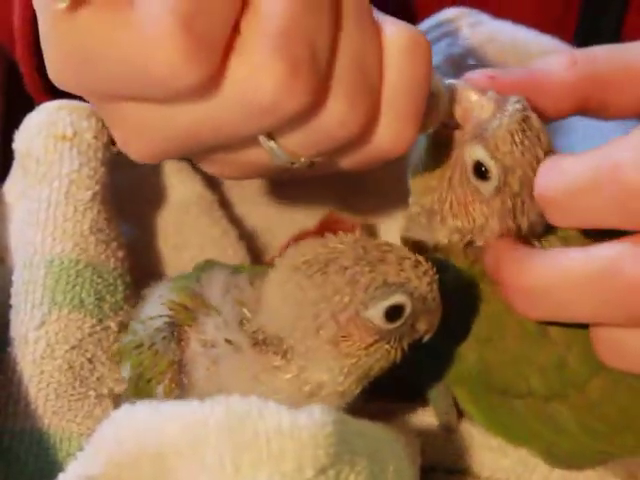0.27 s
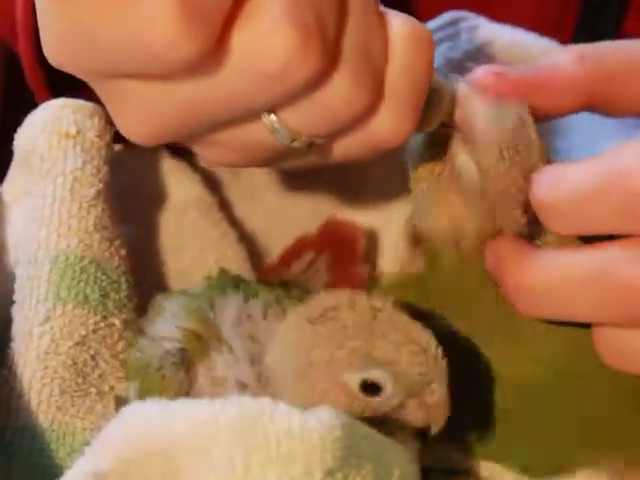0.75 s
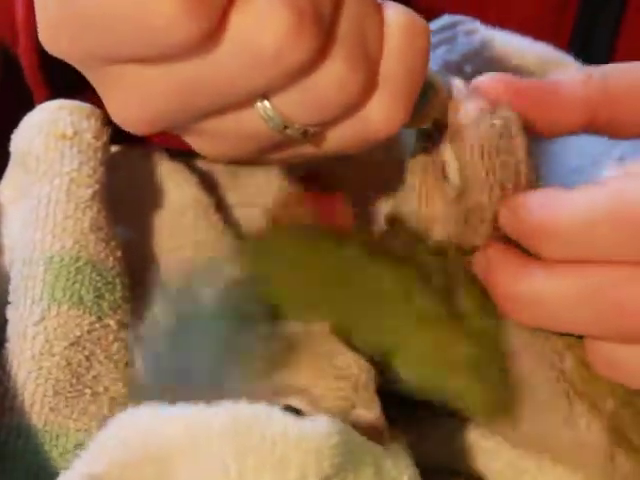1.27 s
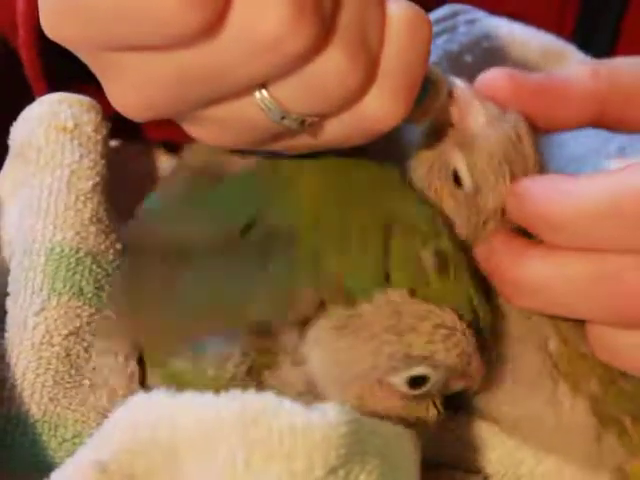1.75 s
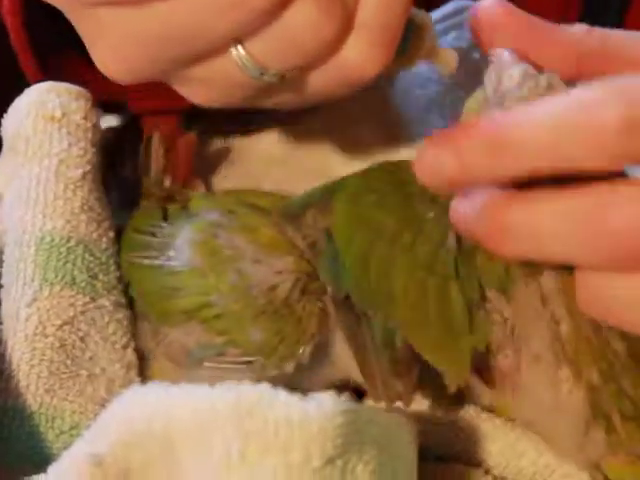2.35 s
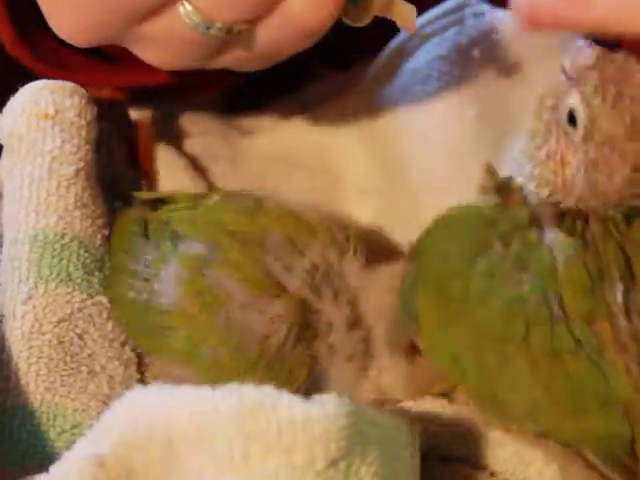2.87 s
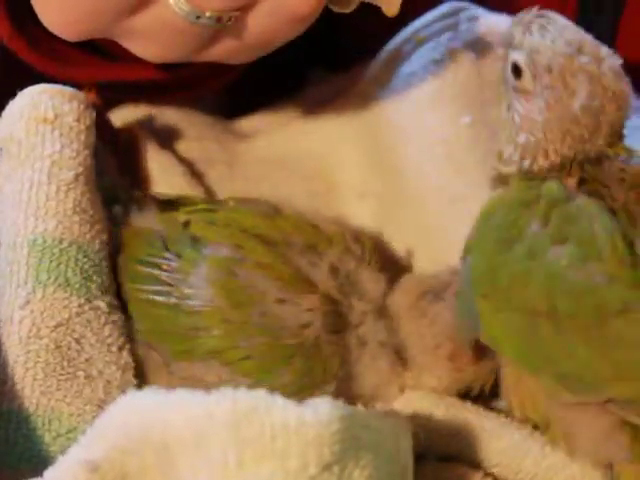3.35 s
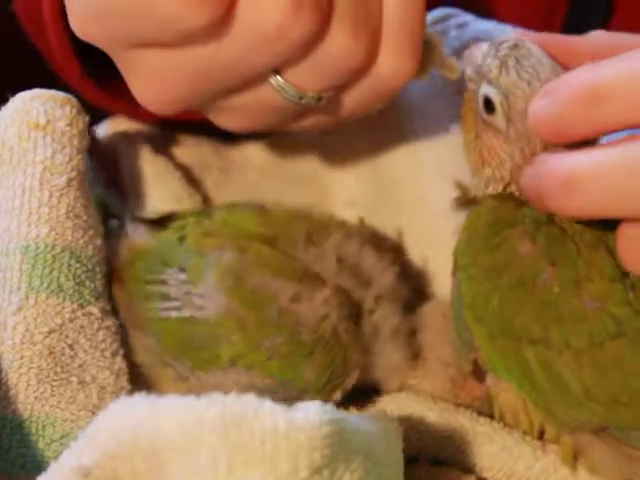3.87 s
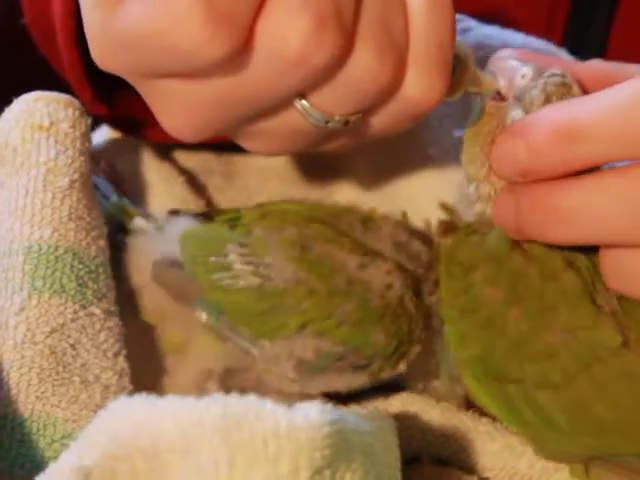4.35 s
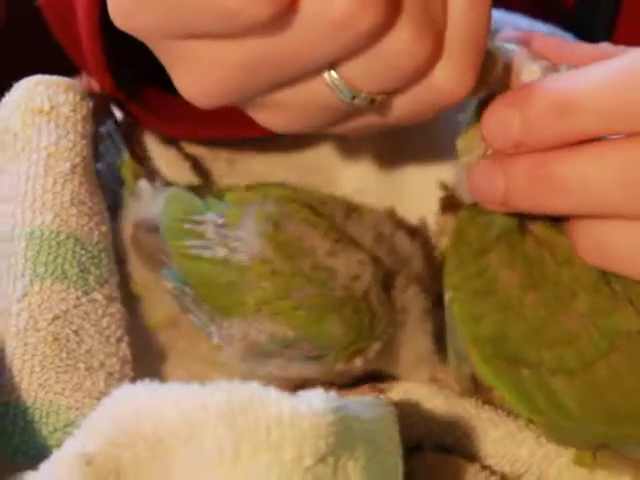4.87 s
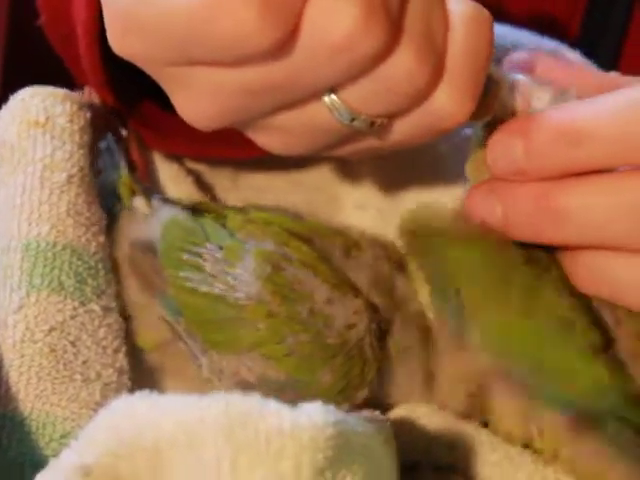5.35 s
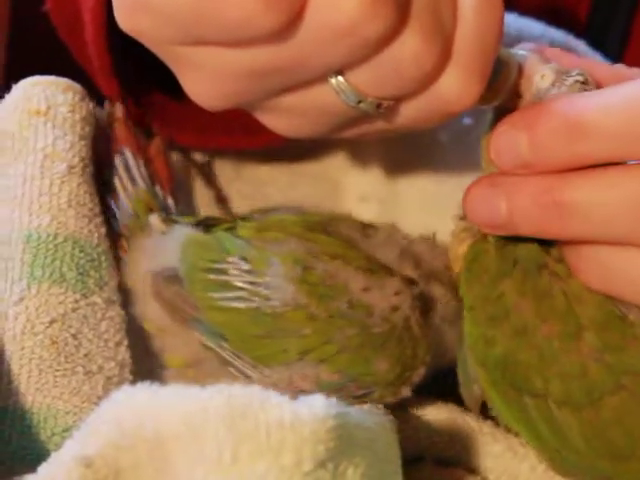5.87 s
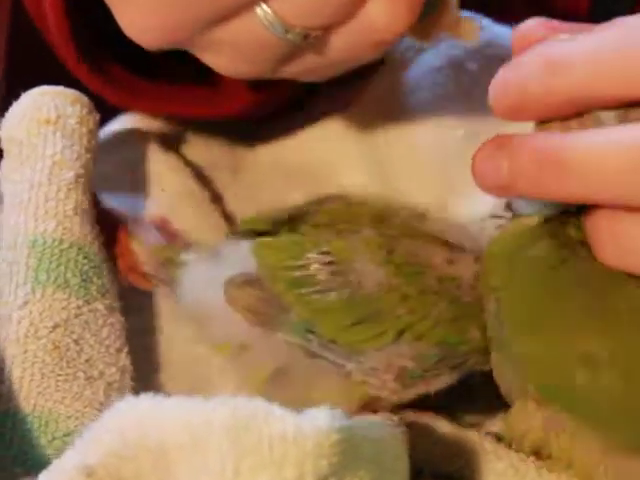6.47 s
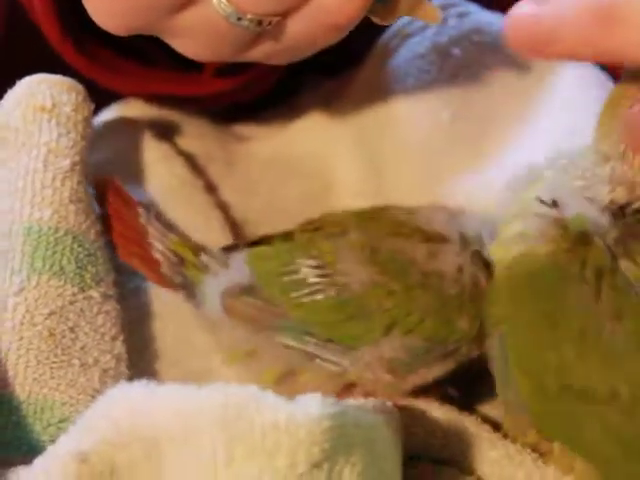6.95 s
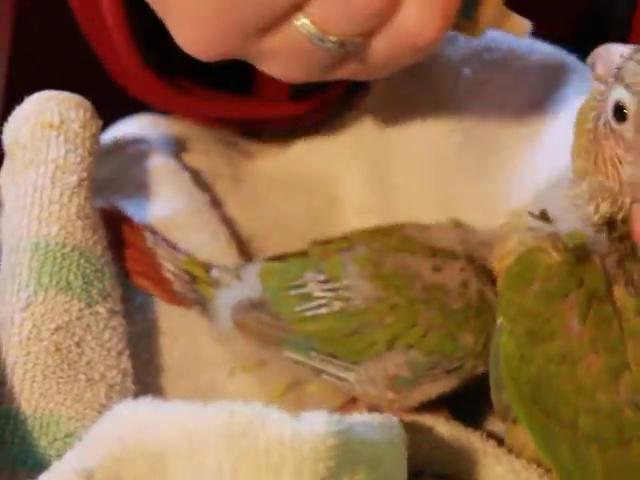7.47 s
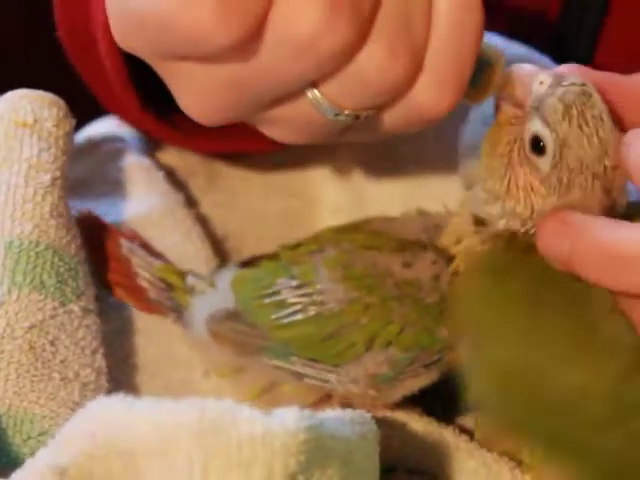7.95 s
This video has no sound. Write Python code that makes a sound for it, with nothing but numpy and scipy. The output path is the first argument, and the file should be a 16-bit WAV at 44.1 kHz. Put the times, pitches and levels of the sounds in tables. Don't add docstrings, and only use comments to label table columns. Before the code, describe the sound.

Very close to the microphone in a bare room, a parrot chick gives sharp, split-second squawks, some clear and sliding down, others rough and broken. Another chick rasps twice, first dry, later softer and breathier. Beaks and claws click in little clusters, feathers and claws brush a towel, and an appliance hums faintly under airy noise that dips after each squawk. A high squawk comes near the end, followed by soft towel knocks.

```python
import sys
import numpy as np
from scipy import signal
from scipy.fft import rfft, irfft, next_fast_len
from scipy.io import wavfile

SR = 44100
rng = np.random.default_rng(int(sys.argv[2]) if len(sys.argv) > 2 else 0)


def transcribe(signal):
    frames = np.atleast_2d(signal).T
    limited = np.clip(frames, -1, 1)
    pcm = np.round(limited * 32767).astype(np.int16)
    wavfile.write(sys.argv[1], SR, pcm)


def invert_db(x):
    u = np.asarray(x, float) / 20
    return 10 ** u


N = 362502

# t/s, first f/Hz, held f/Hz, lets go after/s, swell level/dB
CLEAR_SQUAWKS = [
    (.008, 1370, 1314, .021, -3.5),
    (3.1048, 1140, 1333, .0245, 3),
    (4.1805, 1315, 1268, .018, 5),
    (4.902, 1510, 1190, .016, 1.5),
    (7.865, 1600, 1740, .008, 6),
]
# t/s, rises for/s, top f/Hz, attack over hold level/dB, roughness/0-1
BROKEN_SQUAWKS = [
    (.6555, .0115, 1870, 5, .42),
    (1.7105, .012, 1790, 1, .22),
    (2.5345, .0075, 2000, 3.5, .2),
    (2.9375, .0135, 2170, 0, .18),
    (6.1078, .0135, 2000, 0, .27),
    (6.7762, .0155, 1980, 4, .38),
]
# t/s, f/Hz, level/dB, half-pitch share/0-1, roughness/0-1
PEEP_PATH = [(5.412, 1270, -9, .2, .3), (5.43, 1420, -4, .2, .28), (5.478, 1490, -1, .6, .2),
             (5.486, 1270, 1, .9, .12), (5.499, 800, -10, .5, .3)]
# effort level/dB, windpipe f/Hz, beak f/Hz, beak level/dB,
# treble level/dB
SQUAWK_THROATS = [(-6.5, 3550, 5770, 2.5, -12.5), (-6, 3500, 5100, 3.5, -4.5),
                  (-6.5, 3070, 6280, 4.5, -6.5), (-2, 2940, 4980, 7, -5.5), (-8, 3160, 5560, 4, -6),
                  (-14, 3560, 6100, 4, -6.5), (-11, 3400, 5230, 1, -9), (-8, 3330, 4900, 0.5, -14),
                  (-24.5, 1550, 2750, -1, -33), (-5.5, 2960, 5500, 6, -2.5), (-7.5, 2980, 4540, 2.5, -15.5),
                  (-11, 3600, 5700, 1, -11.5)]
# f/Hz, width/Hz, level/dB
LOW_RESONANCE = (1290, 1200, -15)
# f/Hz, width/Hz
TREBLE_RESONANCE = (7860, 7000)
# t/s, length/s, slap rate/Hz, level/dB, breath share/0-1
RASP_CALLS = [
    (1.4678, .0855, 143, -17, .05),
    (5.4115, .0955, 138, -26, .4),
]
# share of length/0-1, rate factor, level/dB, added breath/0-1
RASP_COURSE = [(0, .6, -10, .35), (.17, .95, -2, .03), (.5, 1, 0, 0), (.86, .88, 0, .15), (1, .8, -14, .4)]
# f/Hz, width/Hz, level/dB
RASP_RESONANCES = [
    [(800, 203, -7), (1404, 200, 1.5), (2530, 230, 3.5), (3290, 250, 3.5), (5565, 560, 6),
     (9280, 8000, -11.5)],
    [(800, 430, -15.5), (1490, 350, -8.5), (2460, 450, -11.5), (3020, 280, -11.5), (4880, 1120, -11),
     (8250, 4000, -25.5)],
]
# t/s, peak level/dB, ring f/Hz, low thump level/dB, crack level/dB
TAPS = [(0.912, -28, 1707, -73, -39.5), (0.966, -33, 1380, -73, -42), (0.976, -52, 3520, -73, -35.5),
        (0.995, -30, 1520, -69, -36.5), (1.073, -31, 1610, -63, -39), (1.218, -15, 8200, -67, -34.5),
        (1.244, -33, 1570, -62, -36.5), (1.293, -36, 1320, -43.5, -40), (1.305, -33, 3880, -67, -37.5),
        (1.329, -36, 1315, -59, -48), (1.419, -38, 990, -51, -47), (4.04, -50, 1558, -42, -60),
        (4.6, -31.5, 1312, -44, -51), (4.655, -36, 1050, -44, -39), (4.681, -56, 750, -44, -44),
        (5.269, -33, 3500, -55, -37), (5.306, -16.5, 1070, -30, -29), (5.352, -33, 3020, -68, -35.5),
        (5.376, -15, 1276, -50, -32), (6.65, -48, 883, -47.5, -45), (7.218, -27.5, 810, -54, -47),
        (7.331, -22, 1625, -33, -32), (7.345, -31, 1490, -64, -37.5)]
BEAK_OPENINGS = [(1.7066, -22, 2700, -50, -28), (2.527, -34, 2500, -55, -34), (4.894, -38, 1500, -60, -42),
                 (6.7695, -30, 4700, -61.5, -34)]
# t/s, level/dB, f/Hz, width/Hz, t60/s
TOWEL_STROKES = [(1.719, -56, 247.4, 200, 0.9), (2.05, -54, 292, 200, 0.89), (4.62, -45, 120, 150, 0.37),
                 (6.981, -56.5, 285, 150, 1), (2.398, -41.5, 800, 707, 0.11), (2.423, -40, 888, 900, 0.071),
                 (5.881, -35.5, 526, 204, 0.063), (5.885, -36.5, 1003, 2930, 0.24),
                 (7.227, -40, 310, 119, 0.14), (7.727, -39, 590, 300, 0.12), (7.73, -41, 1170, 2960, 0.3),
                 (8.09, -33.5, 1620, 70, 0.1), (8.084, -36.5, 1090, 200, 0.12), (8.1, -45, 680, 150, 0.33),
                 (8.172, -41, 298, 121, 0.15), (8.175, -41.5, 715, 150, 0.13)]
# t/s, level/dB, first f/Hz, last f/Hz, length/s
FEED_BUBBLE = (8.066, -40.5, 296, 1498, .014)
# t/s, length/s, cloth level/dB, feather level/dB
RUBS = [(0.952, 0.61, -56, -51.5), (1.8, 0.13, -60, -77.5), (1.998, .4, -63, -57),
        (2.425, 0.081, -61, -55.5), (4.483, .38, -74, -59), (5.06, 0.3, -51, -57), (5.292, .13, -48, -51),
        (5.843, 0.19, -61, -57), (6.379, 0.44, -58, -56.5), (6.964, 0.108, -67, -66),
        (7.071, .39, -53.5, -61), (7.72, .15, -62, -58.5), (8.033, 0.31, -53, -69)]
# f/Hz, level/dB per Hz
CLOTH_COLOUR = [(59, -44), (100, -9), (725, -8.5), (1070, -6.5), (1290, -2), (5000, -28), (6500, -47.5),
                (11000, -120)]
# f/Hz, level/dB per Hz
FEATHER_COLOUR = [(1180, -7), (2000, -2.5), (3650, -3), (6530, -7.5), (8190, -10), (16000, -9.5)]
# f/Hz, level/dB per Hz
AIR_COLOUR = [(12, -35.5), (20, -11), (193, -4.5), (700, -3), (1980, -4.5), (2690, -11), (4840, -17),
              (16100, -25.5)]
# f/Hz, level/dB
MOTOR_LINES = [(742, -59), (1485, -63.5), (2010, -69)]
# f/Hz, t60/s
ROOM_DECAY = [(500, 0.65), (1500, 0.39), (4000, 0.44), (8000, 0.37), (14000, 0.41)]
# delay/s, level/dB
WALL_ECHOES = [(.0045, -20), (0.009, -7), (0.016, -9), (0.029, -17.5), (0.035, -9)]

ATTACK_S, ATTACK_DB = .003, -19


def unit(x):
    return x / np.sqrt(np.mean(x ** 2) + 1e-20)


def along(points, hz):
    f, v = np.transpose(points)
    return np.interp(np.log(hz + 1), np.log(f + 1), v)


def span(rows):
    s, *cols = np.transpose(rows)
    start = round(s[0] * SR)
    t = np.arange(start, round(s[-1] * SR)) / SR
    return start, [np.interp(t, s, c) for c in cols]


def filtered(x, response):
    m = next_fast_len(len(x) + 4096)
    return irfft(rfft(x, m) * response(np.fft.rfftfreq(m, 1 / SR)), m)[:len(x)]


def modes(table):
    def response(f):
        total = 0
        for k, (centre, width, db) in enumerate(table):
            damping = 1j * f * width
            total = total + (-1) ** k * invert_db(db) * damping / (centre * centre - f * f + damping)
        return total
    return response


def hiss(count, spectrum):
    return unit(filtered(rng.standard_normal(count), lambda hz: invert_db(along(spectrum, hz))))


def wobble(count, rate):
    knots = count // 16 + 8
    return np.interp(np.arange(count) * rate / SR, np.arange(knots), rng.standard_normal(knots))


def add(track, start, x, wet_db):
    hz, t, z = signal.stft(rng.standard_normal(32768), SR, nperseg=256)
    decay = invert_db(-60 * t / along(ROOM_DECAY, hz)[:, None])
    tail = signal.istft(z * decay, SR, nperseg=256)[1][:32768]
    tail *= np.clip(np.arange(len(tail)) / SR / 0.031, 0, 1)
    tail *= invert_db(wet_db) / np.linalg.norm(tail)
    tail[0] = 1
    for delay, db in WALL_ECHOES:
        tail[round(delay * SR)] += invert_db(db + wet_db + 3)
    heard = signal.fftconvolve(x, tail)[:N - start]
    track[start:start + len(heard)] += heard


def squawks():
    out = np.zeros(N)
    calls = [clear_call(*row) for row in CLEAR_SQUAWKS]
    calls += [broken_call(*row) for row in BROKEN_SQUAWKS] + [PEEP_PATH]
    calls.sort(key=lambda rows: rows[0][0])
    for rows, (effort_db, pipe_hz, beak_hz, beak_db, treble_db) in zip(calls, SQUAWK_THROATS):
        start, (hz, db, half, rough) = span(rows)
        rough = np.clip(rough, 0, 1)
        phase = np.pi * np.cumsum(hz * (1 + .11 * rough * wobble(len(hz), 500))) / SR
        k = np.arange(1, 41)[:, None]
        size = np.where(k % 2, np.clip(half, 0, 1), 1) * (k * hz / 2 < 17000)
        size = size * invert_db(.1 * (db - db.max()) * k * hz / 2000)
        flicker = np.array([wobble(len(hz), 260) for _ in k])
        size = size * invert_db((2.5 + 6 * rough) * flicker)
        pulses = unit((size * np.cos(k * phase + 1.8 * rng.standard_normal(k.shape))).sum(0))
        breath = rng.standard_normal(len(hz)) * (1 + np.cos(2 * phase))
        source = np.sqrt(1 - rough ** 2) * pulses + 2.2 * rough * breath
        throat = modes([LOW_RESONANCE, (pipe_hz, 800, 0), (beak_hz, 1100, beak_db),
                        (*TREBLE_RESONANCE, treble_db)])
        gain = invert_db(db + effort_db) * np.clip(np.arange(len(hz))[::-1] / 150, 0, 1)
        voiced = filtered(np.pad(gain * source, (0, 300)),
                          lambda f: throat(f) / (1 + (690 / (f + 1)) ** 4) / (1 + (f / 9000) ** 3))
        add(out, start, voiced * np.linalg.norm(gain) / np.linalg.norm(voiced), wet_db=-9.5)
    return out


def clear_call(s, first_hz, held_hz, let_go, swell_db):
    settle_s, knee_s, fall_hz_per_s, last_hz = .0045, .002, 27000, 680
    length = let_go + (held_hz - last_hz) / fall_hz_per_s
    t = np.linspace(0, length, 48)
    slide_s = knee_s * np.logaddexp(0, (t - let_go) / knee_s)
    hz = held_hz + (first_hz - held_hz) * np.exp(-t / settle_s)
    hz += .25 * held_hz * np.exp(-t / .0012)
    hz -= fall_hz_per_s * slide_s
    db = np.interp(t, [0, ATTACK_S, 2.5 * ATTACK_S, let_go / 2 + .008, length],
                   [ATTACK_DB, 0, -3, swell_db, -11])
    fray = np.clip((1240 - hz) / 300, 0, 1) * (t > let_go)
    rough = .03 + .1 * np.exp(-t / ATTACK_S) + .28 * fray
    return np.transpose([s + t, hz, db, .3 * fray, rough])


def broken_call(s, rise, top_hz, attack_db, rough):
    open_hz, close_hz, sink_s = 1810, 1450, .029
    hold_s, break_s = .0099, .009
    length = rise + sink_s
    t = np.linspace(0, length, 48)
    first_hz = min(open_hz, .96 * top_hz)
    hz = np.interp(t, [0, ATTACK_S, rise, length], [first_hz, first_hz, top_hz, close_hz])
    db = np.interp(t, [0, ATTACK_S, 2 * ATTACK_S, rise + hold_s, length],
                   [ATTACK_DB, attack_db, 0, 0, -10.5])
    harsh = np.interp(t, [0, rise, rise + hold_s / 2, length], [.27, rough, rough, .52])
    return np.transpose([s + t, hz, db, np.clip(.1 + t / break_s, 0, 1), harsh])


def rasps():
    out = np.zeros(N)
    for (s, length, top_rate, top_db, share), resonances in zip(RASP_CALLS, RASP_RESONANCES):
        rows = [s, 0, top_db, share] + np.array(RASP_COURSE) * [length, top_rate, 1, 1]
        start, (rate, db, breath) = span(rows)
        cycle = np.cumsum(rate * (1 + .04 * wobble(len(rate), 91))) / SR
        sizes = invert_db(2.5 * rng.standard_normal(64))[cycle.astype(int)]
        gate = sizes * np.exp(-((cycle % 1 - .35) / .25) ** 2) + .7 * breath
        snap = 4 * sizes * np.diff((cycle + .7).astype(int), prepend=0)
        source = unit(gate * rng.standard_normal(len(rate)) + snap)
        throat = modes(resonances)
        voiced = filtered(np.pad(invert_db(db) * source, (0, 600)),
                          lambda f: throat(f) / (1 + (500 / (f + 1)) ** 4) / (1 + (f / 10000) ** 2))
        add(out, start, voiced * np.linalg.norm(invert_db(db - 1.0)) / np.linalg.norm(voiced), wet_db=-9.0)
    return out


def clicks():
    blows, t = np.zeros(N), np.arange(1500) / SR
    crack_colour = [(800, -6.5), (2500, 4.5), (5000, -2.5), (15000, -17.5)]  # f/Hz, level/dB
    thump_colour = [(30, -9.5), (150, -8), (450, -1.0), (900, -16.0), (3000, -56.0)]
    for s, db, hz, thump_db, crack_db in TAPS + BEAK_OPENINGS:
        ring = np.sin(2 * np.pi * hz * t) * np.exp(-t * hz / 4.8)
        crack = hiss(len(t), crack_colour) * invert_db(-60 * t / .016)
        thump = hiss(len(t), thump_colour) * invert_db(-60 * t / 0.022) * (1 - np.exp(-t / 0.00042))
        blow = invert_db(db - 6) * ring + invert_db(crack_db + 2) * crack + invert_db(thump_db + 5.0) * thump
        blows[round(s * SR):][:len(t)] += blow
    out = np.zeros(N)
    add(out, 0, blows, wet_db=-15.0)
    return out


def strokes():
    out, t = np.zeros(N + SR), np.arange(SR // 3) / SR
    for s, db, hz, width_hz, t60 in TOWEL_STROKES:
        body = modes([(hz, width_hz, 0)])
        rub = unit(filtered(rng.standard_normal(len(t)), lambda f: body(f) / (1 + (f / 5000) ** 2)))
        rise = 1 - np.exp(-t / (0.041 * t60))
        out[round(s * SR):][:len(t)] += invert_db(db + 4.5 - 60 * t / t60) * rise * rub
    s, db, first_hz, last_hz, length = FEED_BUBBLE
    u = np.arange(round(length * SR)) / (length * SR)
    phase = 2 * np.pi * np.cumsum(first_hz + (last_hz - first_hz) * u) / SR
    out[round(s * SR):][:len(u)] += invert_db(db) * np.sin(np.pi * u) ** .5 * np.sin(phase)
    return out[:N]


def brushing():
    out = np.zeros(N)
    for s, length, cloth_db, feather_db in RUBS:
        start, n = round(s * SR), round(length * SR)
        cloth = invert_db(cloth_db) * unit(invert_db(2.1 * wobble(n, 90)) * hiss(n, CLOTH_COLOUR))
        feather = invert_db(feather_db) * unit(invert_db(2.6 * wobble(n, 154.8)) * hiss(n, FEATHER_COLOUR))
        fade = signal.windows.tukey(n, 0.46)
        out[start:start + n] += ((cloth + feather) * fade)[:N - start]
    return out


def room_tone():
    t = np.arange(N) / SR
    hum = np.zeros(N)
    for hz, db in MOTOR_LINES:
        hum += invert_db(db + 1.1 * wobble(N, 1.8)) * np.sin(2 * np.pi * hz * t + 1.1 * wobble(N, 39))
    swell_db = .9 * wobble(N, 3) + .5 * wobble(N, 25)
    return invert_db(-51.5 + swell_db) * hiss(N, AIR_COLOUR) + hum


def scene():
    birds = squawks() + rasps()
    touches = clicks() + strokes() + brushing()
    return np.tile(birds + touches + room_tone(), (2, 1))


def limiter(x, top_db, attack, release_db):
    climb = release_db * np.arange(len(x)) / SR
    need = np.minimum(0, top_db - 20 * np.log10(np.abs(x) + 1e-9))
    gain_db = np.minimum(0, np.minimum.accumulate(need - climb) + climb)
    keep = np.exp(-1 / (attack * SR))
    return invert_db(signal.lfilter([1 - keep], [1, -keep], gain_db))


def low_pass(x):
    return signal.sosfilt(signal.butter(12, 16290, fs=SR, output="sos"), x)


def record(dry):
    x = dry * limiter(dry[0], top_db=-4.5, attack=.003, release_db=50)
    x = np.clip(x, -1, 1)
    mono = filtered(x[0], lambda hz: (hz < 16150) / (1 + (35 / (hz + 1)) ** 2))
    return low_pass(np.tile(mono, (2, 1)))


dry = scene()
out = record(dry)
transcribe(out)
```